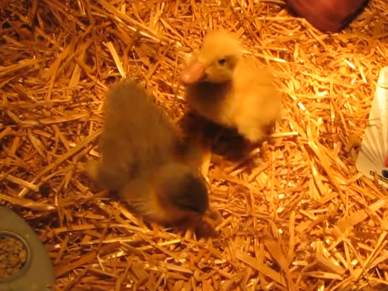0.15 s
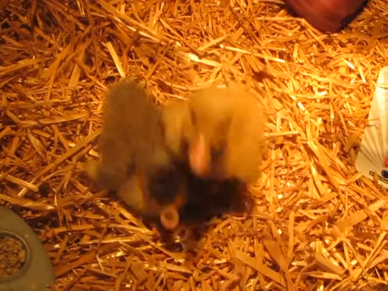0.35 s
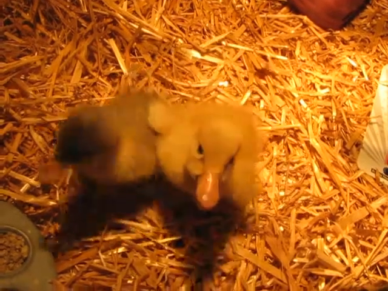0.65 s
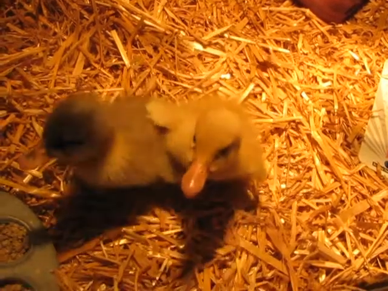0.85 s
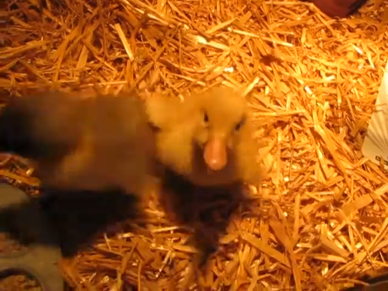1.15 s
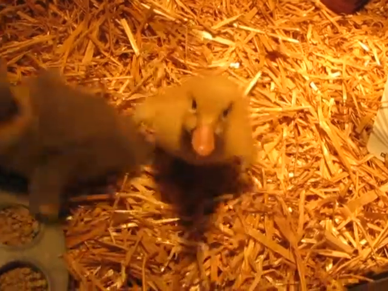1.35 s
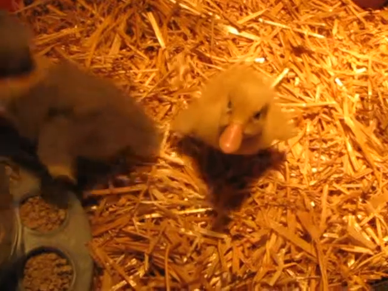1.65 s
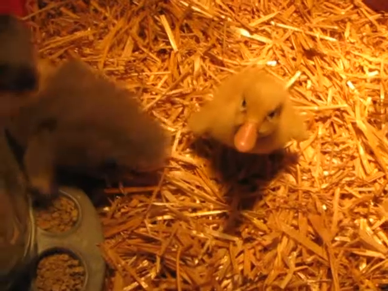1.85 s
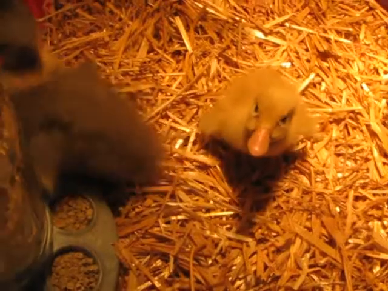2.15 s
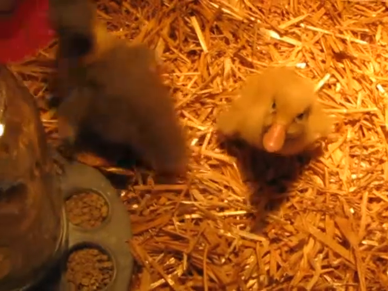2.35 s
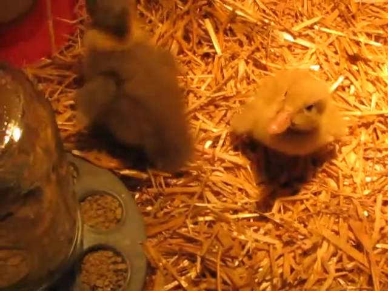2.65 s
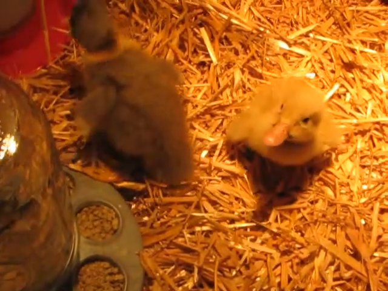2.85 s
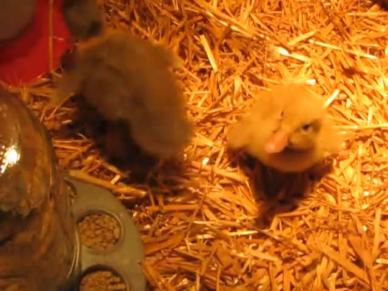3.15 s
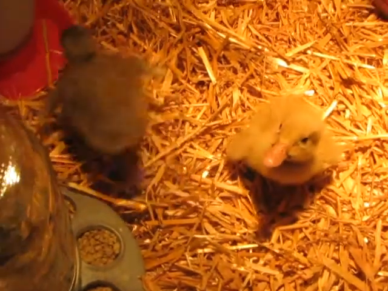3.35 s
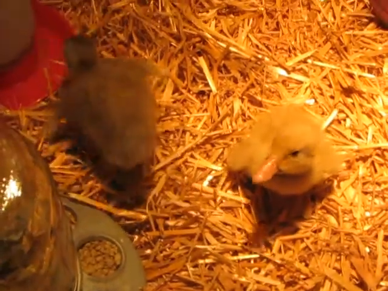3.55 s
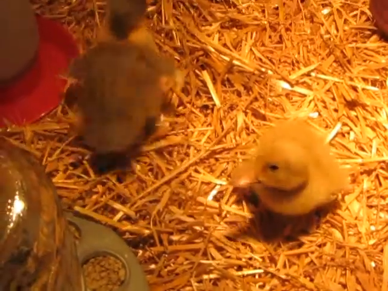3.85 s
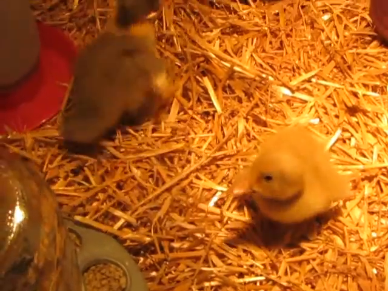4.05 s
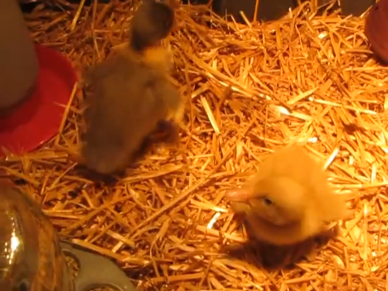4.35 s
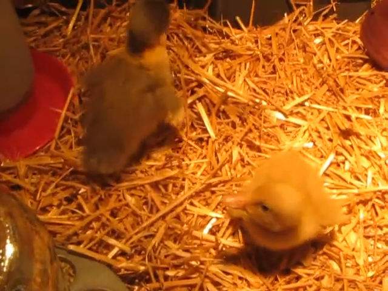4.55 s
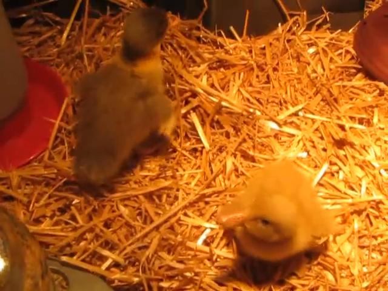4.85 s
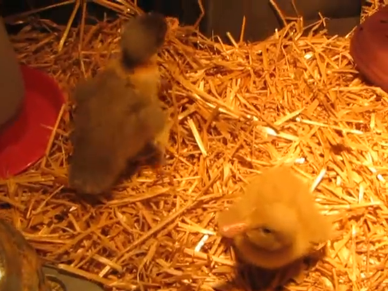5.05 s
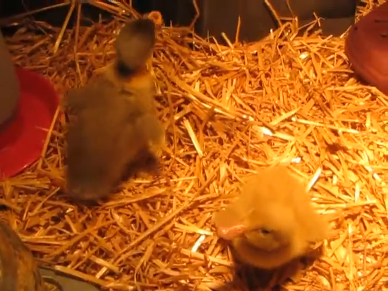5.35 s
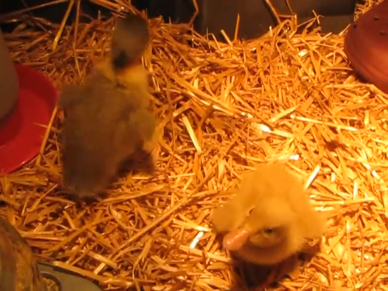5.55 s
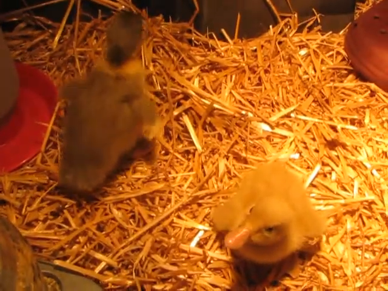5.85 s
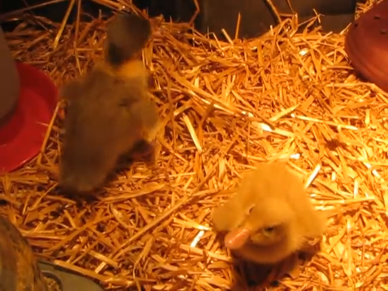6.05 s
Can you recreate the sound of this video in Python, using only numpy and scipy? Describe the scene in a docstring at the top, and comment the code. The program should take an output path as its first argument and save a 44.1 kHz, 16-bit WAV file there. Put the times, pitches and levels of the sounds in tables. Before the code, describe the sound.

High piping whistles turn into falling chirps, then slightly raspy two-toned duckling peeps, with light straw crackle and soft steady fan noise.

```python
"""Indoor brooder with straw bedding: a duckling gives level whistles, then falling peeps, then held calls.
The two sides of its syrinx sing separate pitches that beat against each other and disturb each other.
Straw crackles in clusters underfoot, two dull knocks land, and the walls close by return short reflections.
Behind it a fan gives air noise and hum. A small camera microphone samples it all at a quarter of the rate."""
import sys
import numpy as np
from scipy import signal
from scipy.fft import rfft, irfft
from scipy.io import wavfile

SR = 44100
rng = np.random.default_rng(int(sys.argv[2]) if len(sys.argv) > 2 else 0)


def wav_record(signal):
    """Record a signal, one row per channel, as 16-bit PCM in the file named by sys.argv[1]."""
    frames = np.transpose(np.atleast_2d(signal))
    bounded = np.clip(frames, -1, 1)
    # unit amplitude maps onto the largest positive 16-bit level
    quanta = np.round(bounded * 32767).astype(np.int16)
    wavfile.write(sys.argv[1], SR, quanta)


N = 273861
TIME = np.arange(N) / SR


def from_db(db):
    """Decibels to gain."""
    return 10 ** (np.asarray(db) / 20)


def rms_one(x):
    """Scale to unit rms."""
    return x / np.sqrt(np.mean(x ** 2) + 1e-20)


def noise(gain_at):
    """Unit noise whose spectrum follows a function of frequency."""
    hz = np.maximum(np.arange(N // 2 + 1) * SR / N, 1)
    return rms_one(irfft(rfft(rng.standard_normal(N)) * gain_at(hz), N))


def drift(rate_hz):
    """Random wavering, mostly slower than a given rate, spread 1."""
    return noise(lambda hz: 1 / (1 + (hz / rate_hz) ** 2))


def call_ages(length_s):
    """Even steps of time through one call."""
    return np.linspace(0, length_s, 120)


def hump(x, centre, width):
    """Bell curve of height 1."""
    return np.exp(-((x - centre) / width) ** 2)


BILL_HZ, BILL_WIDTH_HZ, BILL_DB = 3440, 164, 7   # centre, half-width, gain


def through_bill(hz, db):
    """A gliding voice swells as it passes the resonance of throat and bill; returns pitch and level."""
    return hz, db + BILL_DB / (1 + ((hz - BILL_HZ) / BILL_WIDTH_HZ) ** 2)


# Level whistles: start_s, length_s, start_hz, end_hz, level_db (before the sag), attack_s,
# attack_rise_db, dip_db (negative lifts), closing_upper_db (against the lower side),
# octave_db (against the voices)
WHISTLE_ROWS = [ (0.148, 0.1, 3527, 3440, -23.5, .012, 10.5, 11, -10, -20),
                (0.446, 0.094, 3460, 3490, -21, 0.022, 11, -4, -15, -23),
                (0.742, 0.11, 3448, 3294, -26, 0.0092, 3, -5.5, -0.5, -17.5),
                (1.183, .041, 3157, 3275, -24.5, 0.0039, 29, -7, 4.5, -20.5), ]
WHISTLE_SAG_DB = 7               # loss of level by the end
DIP_AT, DIP_S = 0.67, 0.0067     # place as share of the length, half-width


def whistle(row, open_ratio=1.2, close_ratio=1.1, open_db=-1, rest_db=-32, joins_s=0.0084):
    """One side of the syrinx holds a nearly level note; the upper side is strong only at start and end."""
    (start_s, length, start_hz, end_hz, level_db,
     attack_s, rise_db, dip_db, close_db, octave_db) = row
    age = call_ages(length)
    hz = np.interp(age, [0, length], [start_hz, end_hz])
    attack = np.interp(age, [0, attack_s], [rise_db, 0])
    dip = dip_db * hump(age, DIP_AT * length, DIP_S)
    db = level_db - attack - WHISTLE_SAG_DB * age / length - dip
    ratio = np.interp(age, [0, length], [open_ratio, close_ratio])
    upper_db = np.interp(age, [0, joins_s, length - joins_s, length],
                         [open_db, rest_db, rest_db, close_db])
    return start_s + age, hz, db, ratio * hz, db + upper_db, octave_db


# Falling peeps, the lower voice takes over from the upper: start_s, length_s, start_hz, end_hz
# (lower voice), upper_db, upper_peak_s, lower_db, lower_rise_db, lower_full_s, lower_stay_s,
# octave_db (against the voices). Voice levels are before the bill.
FALLING_ROWS = [ (1.727, 0.065, 2660, 1940, -46, .008, -25.5, 24, 0.016, 0.0049, -38),
                (1.959, 0.078, 3010, 2157, -42.5, 0.017, -27, 22.5, 0.041, 0.012, -38),
                (2.302, 0.089, 3002, 2160, -39.5, 0.016, -28, 19, 0.033, 0.031, -31),
                (2.604, 0.1, 3080, 2410, -37, 0.021, -27.5, 46, 0.032, 0.052, -30),
                (2.901, .096, 3116, 2618, -23.5, 0.021, -29.5, 87, 0.061, 0.025, -34),
                (3.206, .105, 3290, 2550, -44.5, 0.0044, -34, 11.5, 0.065, .05, -21), ]
FALL_INTERVAL, FALL_BEND = 1.15, 1.15   # pitch ratio of the voices; bend above 1 flattens the fall's end
UPPER_RISE_DB_PER_S, UPPER_FADE_DB_PER_S, LOWER_FADE_DB_PER_S = 525.5, 525, 649


def falling_peep(row):
    """Both voices fall together; the upper one leads and hands over to the lower."""
    (start_s, length, start_hz, end_hz, upper_db, peak_s,
     lower_db, rise_db, full_s, stay_s, octave_db) = row
    age = call_ages(length)
    hz = end_hz + (start_hz - end_hz) * np.maximum(1 - age / length, 0) ** FALL_BEND
    lower_fade = LOWER_FADE_DB_PER_S * np.maximum(age - full_s - stay_s, 0)
    lower = lower_db - np.interp(age, [0, full_s], [rise_db, 0]) - lower_fade
    upper = upper_db - np.maximum(UPPER_RISE_DB_PER_S * (peak_s - age),
                                  UPPER_FADE_DB_PER_S * (age - peak_s))
    return start_s + age, *through_bill(hz, lower), *through_bill(FALL_INTERVAL * hz, upper), octave_db


# Two-voiced calls, slide to a held note: start_s, length_s, attack_hz, sag_hz_per_s,
# slide_s (after the start), held_hz, push_hz, lower_attack_db, upper_attack_db, lower_held_db,
# upper_held_db, octave_db (against the voices).
# Pitches are of the lower voice, voice levels are before the bill.
HELD_ROWS = [ (3.489, .113, 3254, 7130, .048, 2710, 58, -41.5, -33, -32.5, -57, -27),
             (3.776, 0.11, 3350, 8930, .049, 2708, 48, -28, -36.5, -32, -40, -27),
             (4.067, 0.12, 3320, 4800, 0.036, 2783, 22.5, -28.5, -37.5, -33, -41, -25),
             (4.369, 0.11, 3423, 7930, 0.044, 2786, 46, -28, -32.5, -35, -39.5, -26.5),
             (4.662, 0.12, 3297, 4860, 0.051, 2765, 40, -29.5, -35.5, -32, -37, -27),
             (4.964, 0.11, 3397, 5580, 0.052, 2737, 11, -28, -34, -30, -37, -27),
             (5.262, 0.11, 3390, 7900, 0.061, 2734, 49, -26.5, -32, -27.5, -34, -27),
             (5.567, 0.12, 3440, 1200, 0.056, 2885, 10, -27, -30, -33, -35.5, -25),
             (5.888, .12, 3370, 500, 0.044, 2850, 36.6, -31.5, -30.5, -35.5, -39, -26.5), ]
SPLIT_S, SPLIT_HZ = 0.0035, 280                # the lower voice splits off from above its pitch
LOWER_ATTACK_S, LOWER_ATTACK_DB = 0.013, 14.5  # time and size of the opening rise
UPPER_ATTACK_S, UPPER_ATTACK_DB = 0.047, 5.5
SLIDE_S, UPPER_LAG_S = .01, .005               # half-length of the slide; the upper voice follows later
ATTACK_GAP_HZ, HELD_GAP_HZ = 376, 456.3        # distance between the two voices
PUSH_AT, PUSH_S = .83, 0.018                   # place as share of the length, half-width
PUSH_UPPER_TIMES, PUSH_UPPER_DB = 2.4, 2       # the push lifts the upper voice further and swells it


def held_call(row):
    """Two voices split apart, sag in the attack, slide to a held note and lift in a last push."""
    (start_s, length, attack_hz, sag_hz_per_s, slide_s, held_hz, push_hz,
     lower_db, upper_db, lower_held_db, upper_held_db, octave_db) = row
    age = call_ages(length)

    def slide(start, end, lag_s=0):
        return end + (start - end) * .5 * (1 - np.tanh((age - slide_s - lag_s) / SLIDE_S))

    sagging = attack_hz - sag_hz_per_s * age
    push = hump(age, PUSH_AT * length, PUSH_S)
    split = SPLIT_HZ * np.exp(-age / SPLIT_S)
    lower_hz = slide(sagging, held_hz) + split + push_hz * push
    upper_hz = slide(sagging + ATTACK_GAP_HZ, held_hz + HELD_GAP_HZ, UPPER_LAG_S)
    upper_hz += PUSH_UPPER_TIMES * push_hz * push
    lower = slide(lower_db, lower_held_db)
    lower -= np.interp(age, [0, LOWER_ATTACK_S], [LOWER_ATTACK_DB, 0])
    upper = slide(upper_db, upper_held_db, UPPER_LAG_S) + PUSH_UPPER_DB * push
    upper -= np.interp(age, [0, UPPER_ATTACK_S], [UPPER_ATTACK_DB, 0])
    return start_s + age, *through_bill(lower_hz, lower), *through_bill(upper_hz, upper), octave_db


SNAP_S = 0.0015               # the voice snaps from the quiet flick into the call
DROP_TO, DROP_DB = 0.77, -9   # a call collapses as the pressure goes: pitch ratio, level
IDLE_SIDE_DB = -20            # the side that takes little part in the opening flick or closing drop


def voice_track(t, s, hz, db, flick_s, flick_from, flick_db, drop_s, drop_db):
    """Pitch and amplitude of one side of the syrinx, with the opening flick and closing drop."""
    knots = np.r_[s[0] - flick_s, s[0] - min(SNAP_S, flick_s / 2), s, s[-1] + drop_s]
    flick = 1 - (1 - flick_from) * (np.maximum(s[0] - t, 0) / flick_s) ** 1.5
    pitch = flick * np.interp(t, knots, np.r_[hz[0], hz[0], hz, hz[-1] * DROP_TO])
    level_knots = np.r_[db[0] + flick_db, db[0] + flick_db, db, db[-1] + drop_db]
    level = np.interp(t, knots, level_knots)
    gate = np.clip(np.minimum(t - knots[0], knots[-1] - t) / 0.00038, 0, 1)
    return pitch, np.sqrt(2) * from_db(level) * gate


RASP_HZ, RASP_WIDTH_HZ = 4170, 640   # centre and half-width of the rasp in the attack


def duckling(calls, flick_s, flick_from, flick_db, drop_s, settle_s, rasp_db, coupling,
             jitter=0.0048, onset_jitter=0.011, waver=0.0022, shimmer_db=2.29, sum_tone_db=5):
    """Two coupled membranes whistle; where both sound they start with a rasp and then settle."""
    out = np.zeros(N)
    wobbles = [drift(210), drift(220)]
    shimmer = from_db(shimmer_db * drift(50))
    unsteady = 1 + waver * drift(32)   # the air pressure wavers and bends both voices
    rasp = from_db(rasp_db) * noise(lambda hz: 1 / (1 + ((hz - RASP_HZ) / RASP_WIDTH_HZ) ** 4))
    for s, low_hz, low_db, high_hz, high_db, octave_db in calls:
        at = (TIME > s[0] - flick_s) & (TIME < s[-1] + drop_s)
        t = TIME[at]
        # the lower side idles in the flick, the upper side in the drop
        low_pitch, low = voice_track(t, s, low_hz, low_db, flick_s, flick_from,
                                     IDLE_SIDE_DB, drop_s, DROP_DB)
        high_pitch, high = voice_track(t, s, high_hz, high_db, flick_s, flick_from,
                                       flick_db, drop_s, IDLE_SIDE_DB)
        total = np.hypot(low, high) + 1e-9
        both = low * high / total

        # in the attack the membranes disturb each other most when they are equally strong
        unsettled = np.exp(-(np.maximum(t - s[0], 0) / settle_s) ** 2)
        unrest = jitter + onset_jitter * unsettled * 2 * both / total

        def phase(pitch, wobble):
            cycles = np.cumsum(pitch * (unsteady[at] + unrest * wobble[at])) / SR
            return 2 * np.pi * (cycles + rng.random())

        low_phase = phase(low_pitch, wobbles[0])
        high_phase = phase(high_pitch, wobbles[1])
        tone = low * np.sin(low_phase) + high * np.sin(high_phase)

        # each membrane modulates the other: side tones at steps of the beat rate,
        # stronger and reaching higher in the attack
        beat = high_phase - low_phase
        sides = (1 + 2 * unsettled) * np.sin(high_phase + beat)
        sides += .5 * np.sin(low_phase - beat)
        sides += unsettled * np.sin(high_phase + 2 * beat)
        tone += coupling * both * sides

        # the shared airflow is not linear: weak octaves and a sum tone
        octaves = low * np.sin(2 * low_phase) + high * np.sin(2 * high_phase)
        sum_tone = from_db(sum_tone_db) * both * np.sin(low_phase + high_phase)
        tone += from_db(octave_db) * (octaves + sum_tone)
        out[at] += shimmer[at] * tone + both * unsettled * rasp[at]
    return out


# Steps in the straw: peak_s, level_db, build_up_s
STEP_ROWS = [(0.943, -45.5, .004), (1.2, -38.5, .01), (1.328, -41.5, .015), (1.389, -36.5, .002),
             (2.315, -39.5, .012), (3.061, -39, .002), (3.292, -43, .003), (3.895, -37.5, .014),
             (4.288, -43.5, .004)]
STEP_S = .014   # decay time of a step


def straw(snaps_per_s=3000, spread_db=4, idle_per_s=60, idle_db=-59):
    """Each step snaps a cluster of stalks; all the while the bedding crackles faintly."""
    pressure = np.zeros(N)
    for peak_s, level_db, rise_s in STEP_ROWS:
        fall_or_rise_s = np.where(TIME < peak_s, rise_s, STEP_S)
        pressure += from_db(level_db) * np.exp(-np.abs(TIME - peak_s) / fall_or_rise_s)
    stalk_band = signal.butter(2, [1000, 4300], "band", fs=SR, output="sos")

    def snaps(per_s):
        sizes = from_db(spread_db * np.minimum(rng.exponential(1, N), 2)) * rng.choice([-1, 1], N)
        stalk = rng.standard_normal(300) * np.exp(-np.arange(300) / 70)   # decay in samples
        hits = sizes * (rng.random(N) < per_s / SR)
        return rms_one(signal.sosfilt(stalk_band, signal.fftconvolve(hits, stalk)[:N]))

    return pressure * snaps(snaps_per_s) + from_db(idle_db) * snaps(idle_per_s)


# Dull knocks: start_s, peak_db
KNOCK_ROWS = [(1.388, -35.5), (5.584, -33.5)]


def bumps(push_s=0.0008):
    """A dull knock is one brief push of air that relaxes more slowly than it rises."""
    out = np.zeros(N)
    for start_s, peak_db in KNOCK_ROWS:
        age = np.maximum(TIME - start_s, 0) / push_s
        out -= from_db(peak_db) * age * np.exp(1 - age)
    return out


BROODER_T60_S, BROODER_DB = .14, -10.5   # decay by 60 dB; level of the reflections


def brooder(x):
    """Dense, short reflections from the walls around the pen."""
    age = TIME[:SR // 2]
    echoes = rng.standard_normal(len(age)) * from_db(-60 * age / BROODER_T60_S) * (age > .003)
    return from_db(BROODER_DB) * signal.fftconvolve(x, echoes / np.linalg.norm(echoes))[:N]


HOLD = 4   # output samples per sample that the camera takes
# Spectrum of the air noise of room and fan: pitch_hz, relative_db (per Hz)
AIR_ROWS = [(65, -6.5), (85, 1.5), (135, -7), (430, -6), (520, -3.5), (620, -3), (850, 0), (1200, -9),
            (2800, -7.5), (5000, -13.5)]
AIR_DB = -47   # rms
# Hum of the fan: pitch_hz, half_width_hz, rms_db
HUM_ROWS = [(116, 0.71, -66), (175.7, 1.9, -65.5), (504.3, 29, -61), (688.5, 24, -56)]


def fan():
    """Steady air noise with motor hum and two narrow housing resonances."""
    points_hz, points_db = np.transpose(AIR_ROWS)

    def air_gain(hz):
        below_camera_limit = hz < SR / HOLD / 2
        return from_db(np.interp(np.log(hz), np.log(points_hz), points_db)) * below_camera_limit

    out = from_db(AIR_DB) * noise(air_gain)
    for centre, width, rms_db in HUM_ROWS:
        out += from_db(rms_db) * noise(lambda hz: 1 / (1 + ((hz - centre) / width) ** 2))
    return out


def scene():
    """Calls and straw in the pen, over the fan; whistles snap in, peeps and held calls slide up first."""
    whistles = duckling(map(whistle, WHISTLE_ROWS), flick_s=.0087, flick_from=0.98, flick_db=-8,
                        drop_s=0.0089, settle_s=.014, rasp_db=1, coupling=.057)
    falling = duckling(map(falling_peep, FALLING_ROWS), flick_s=.019, flick_from=.77, flick_db=-6,
                       drop_s=.013, settle_s=.04, rasp_db=-12.5, coupling=.15)
    held = duckling(map(held_call, HELD_ROWS), flick_s=.02, flick_from=.8, flick_db=-6,
                    drop_s=0.017, settle_s=.033, rasp_db=-8, coupling=0.17)
    near = whistles + falling + held + straw()
    return (near + brooder(near) + bumps() + fan())[None]


CUTOFF_HZ, HISS_TOP_HZ = 7550, 15700


def record(dry, hiss_db=-96):
    """Quarter-rate sampling folds overtones to 4-5.5 kHz; the output filter passes a little mirror image."""
    sampled = HOLD * dry * (np.arange(N) % HOLD == 0)   # zeros between the samples taken
    output_filter = signal.cheby2(12, 82, CUTOFF_HZ, fs=SR, output="sos")
    smooth = signal.sosfilt(output_filter, sampled)
    return smooth + from_db(hiss_db) * noise(lambda hz: hz < HISS_TOP_HZ)


dry = scene()
out = record(dry)
wav_record(out)
```